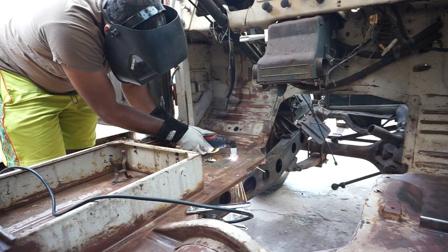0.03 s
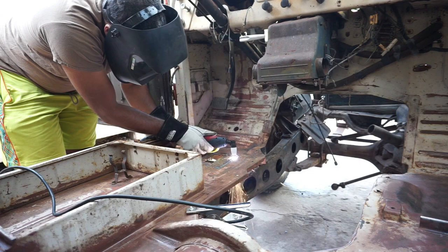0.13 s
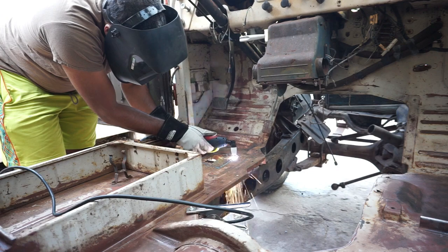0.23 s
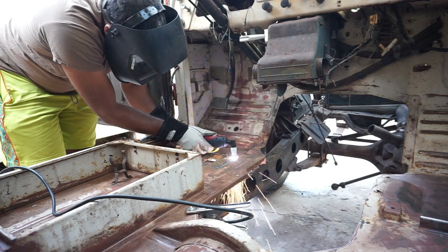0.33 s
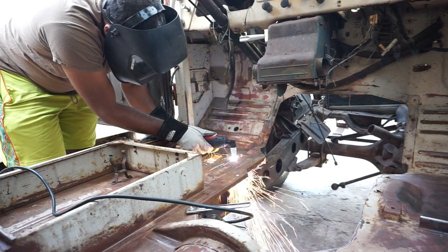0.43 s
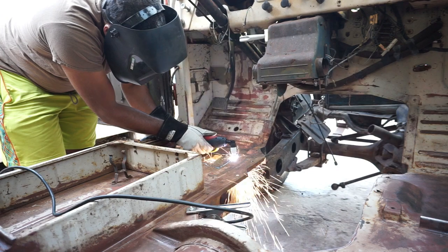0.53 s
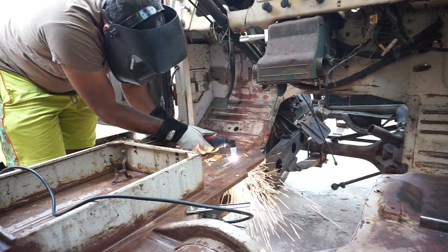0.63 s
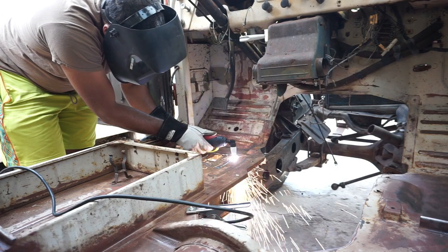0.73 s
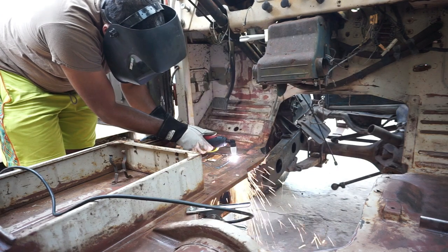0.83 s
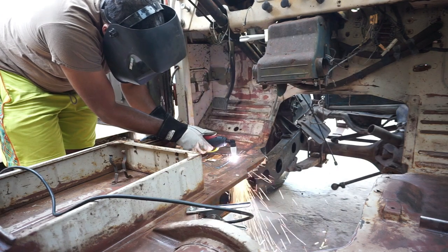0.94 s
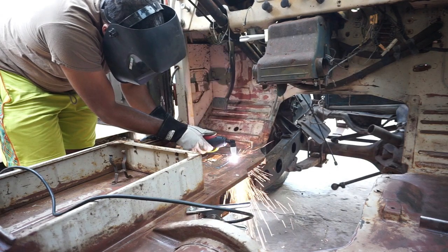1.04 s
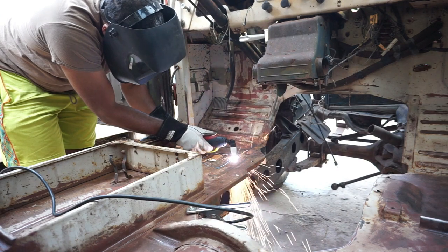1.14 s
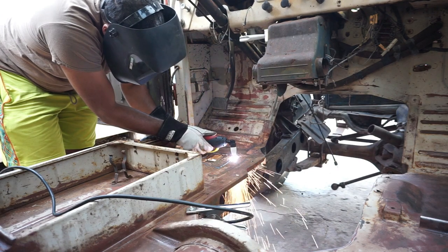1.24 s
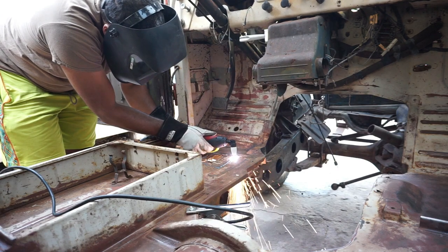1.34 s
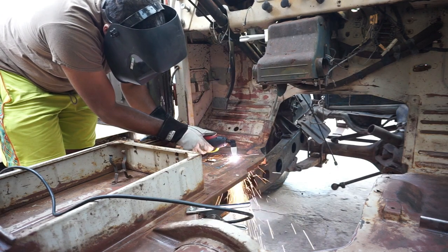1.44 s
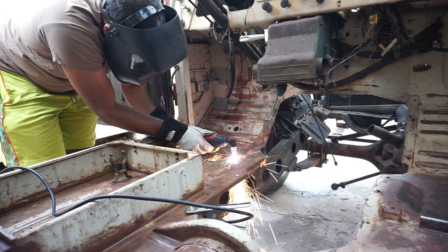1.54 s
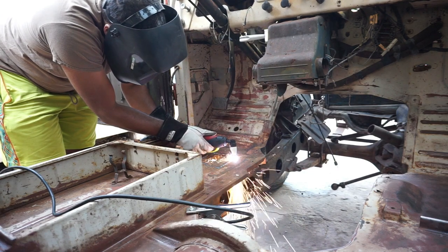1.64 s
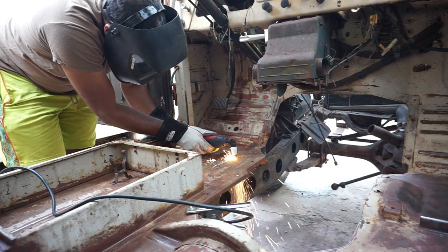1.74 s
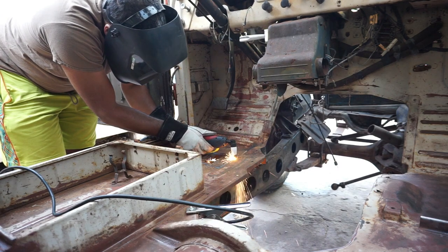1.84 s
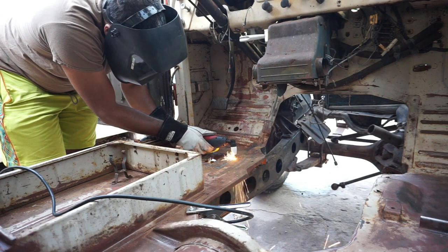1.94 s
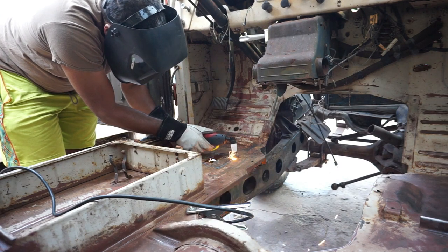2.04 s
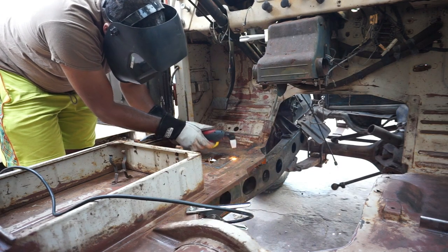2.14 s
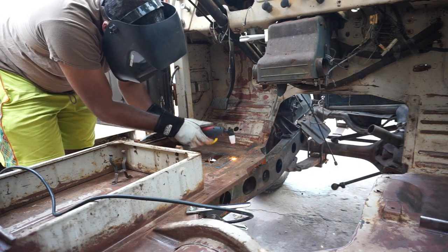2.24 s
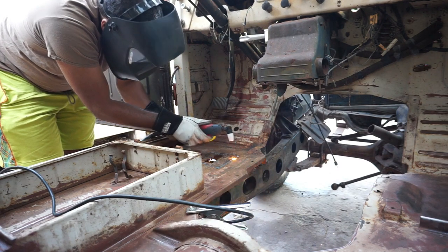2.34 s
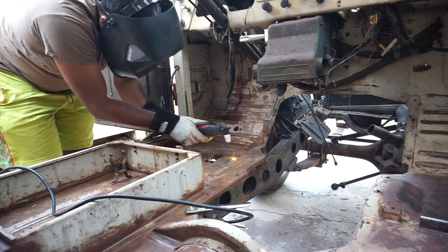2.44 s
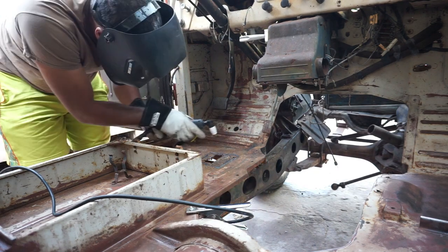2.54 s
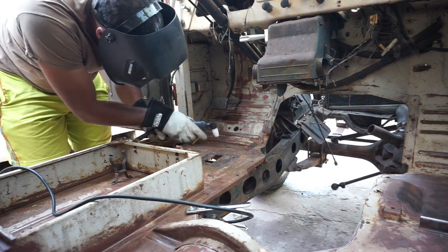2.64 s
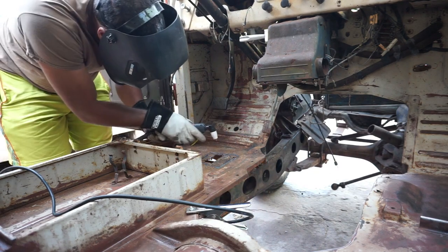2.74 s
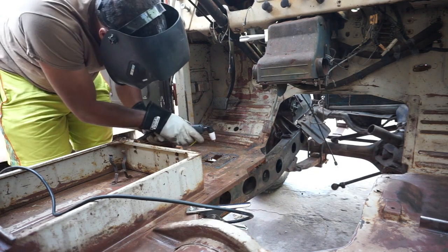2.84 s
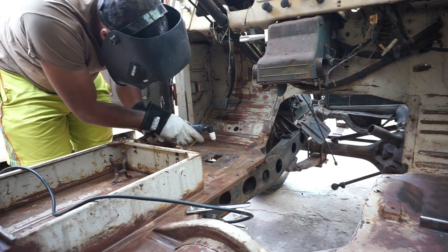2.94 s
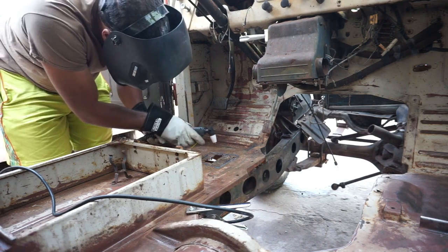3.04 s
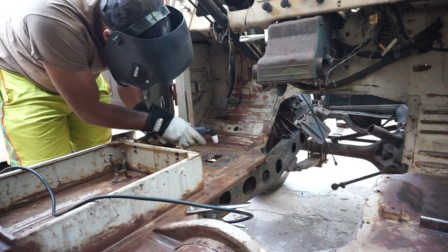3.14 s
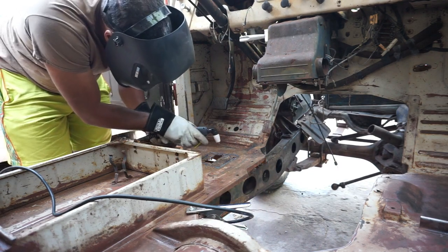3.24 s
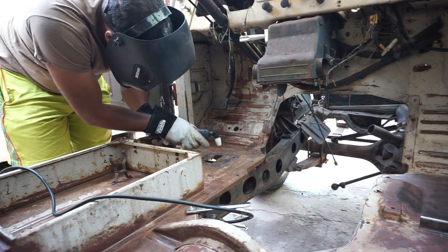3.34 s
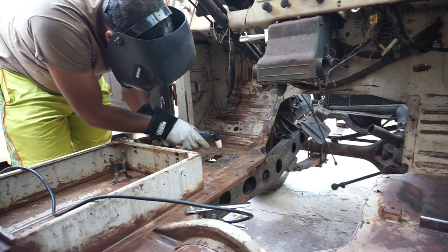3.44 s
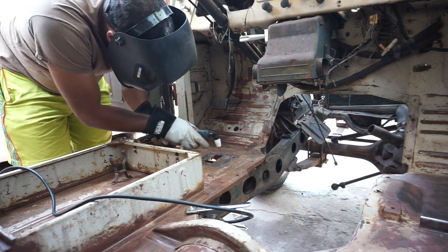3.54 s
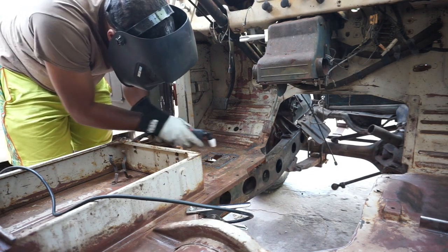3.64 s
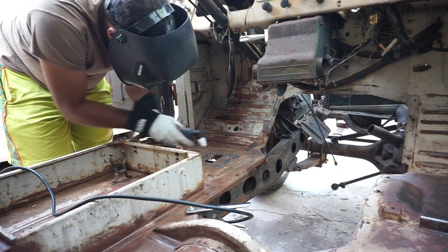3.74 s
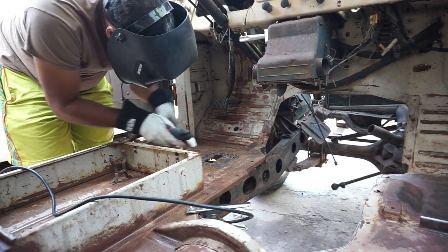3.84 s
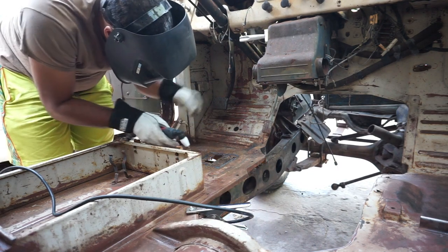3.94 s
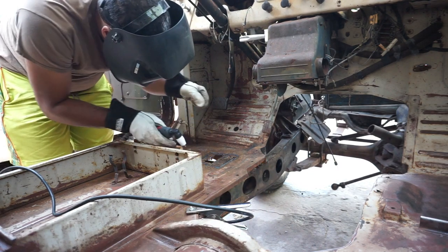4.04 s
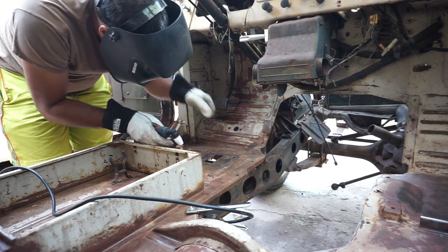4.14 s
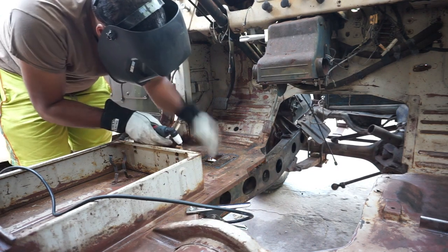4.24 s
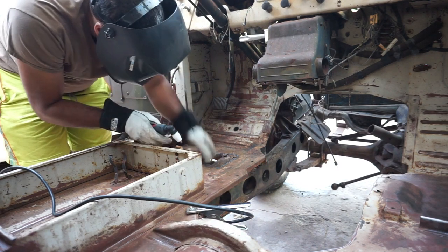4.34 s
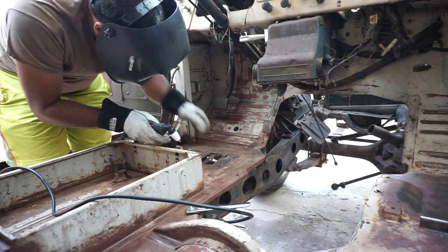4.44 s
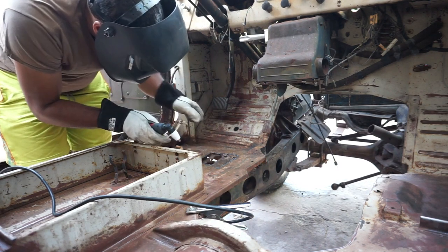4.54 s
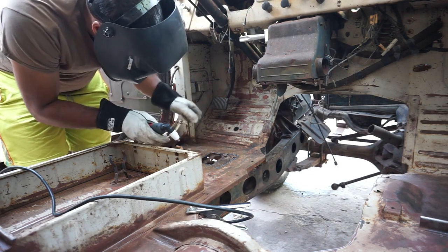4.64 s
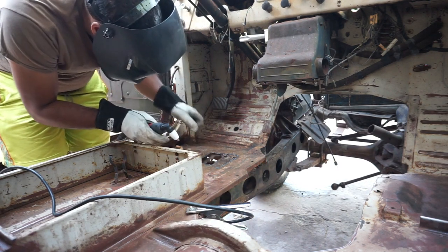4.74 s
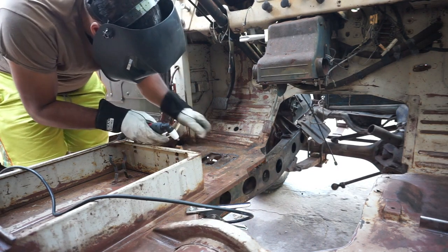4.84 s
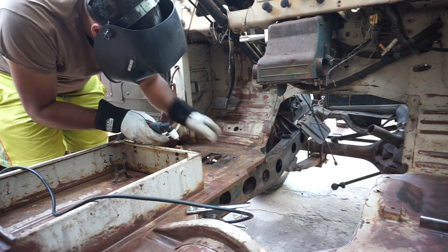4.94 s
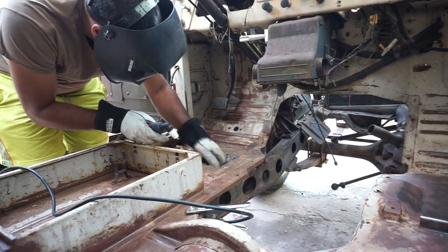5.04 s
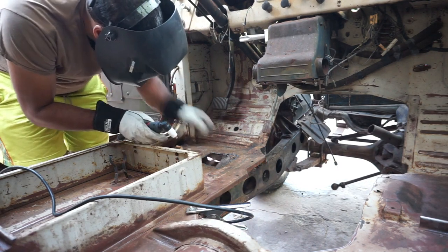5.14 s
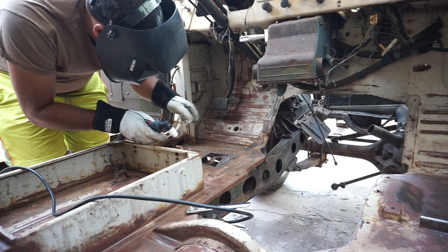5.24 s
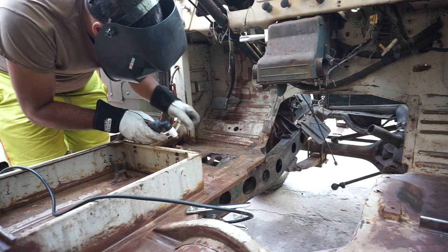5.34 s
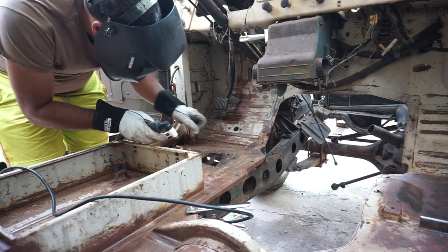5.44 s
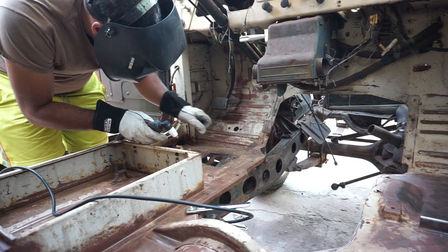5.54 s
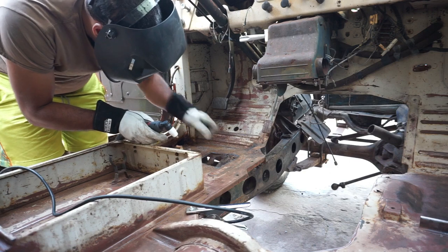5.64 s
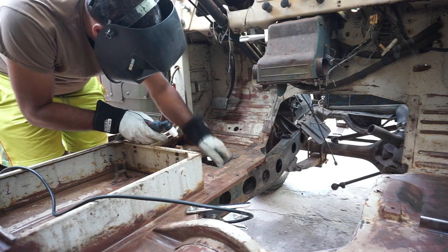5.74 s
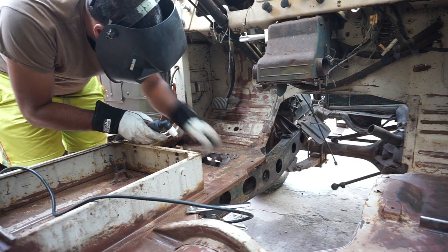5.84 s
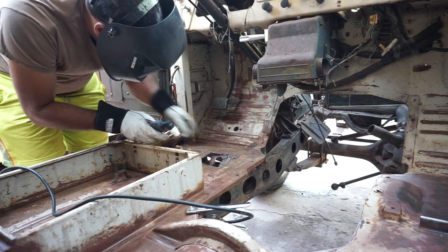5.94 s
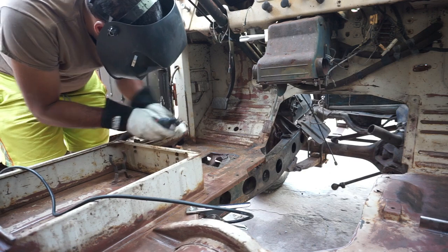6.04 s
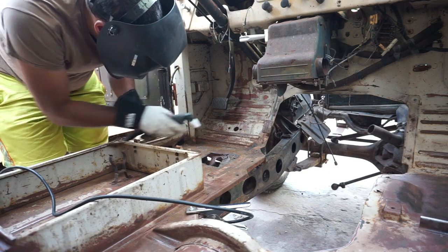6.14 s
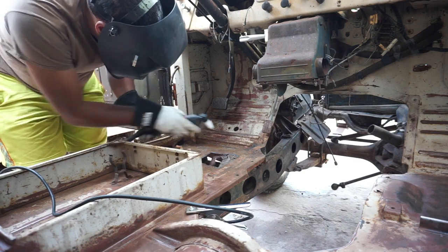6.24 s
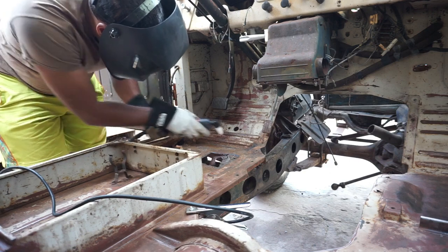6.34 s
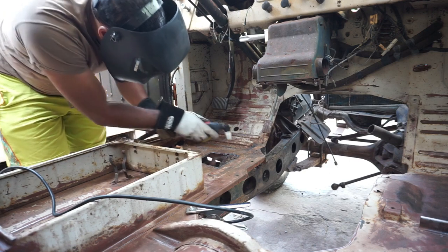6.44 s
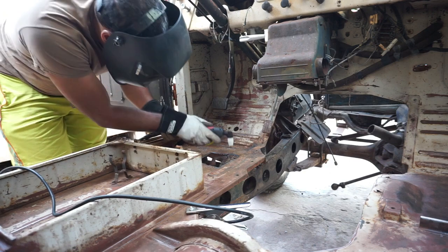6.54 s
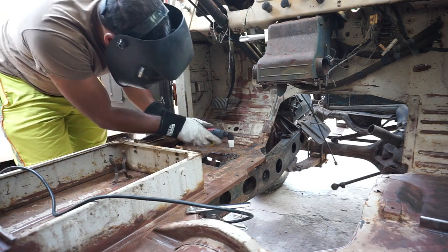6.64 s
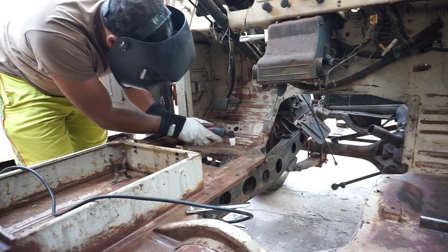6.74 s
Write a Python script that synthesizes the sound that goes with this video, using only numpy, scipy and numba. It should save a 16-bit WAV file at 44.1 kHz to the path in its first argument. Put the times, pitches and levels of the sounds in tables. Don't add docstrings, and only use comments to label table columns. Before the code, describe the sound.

A plasma torch hisses fiercely through rusty sheet steel, pops off and sighs shut; then a compressor throbs while metal clatters in three crashes.

```python
import sys
import numpy as np
from scipy import signal
from scipy.fft import rfft, irfft
from scipy.io import wavfile
from numba import njit

SR = 44100
rng = np.random.default_rng(int(sys.argv[2]) if len(sys.argv) > 2 else 0)


def linear_from_db(decibels):
    return 10 ** (np.asarray(decibels, float) / 20)


def transcribe(signal):
    frames = np.atleast_2d(signal).T
    limited = np.clip(frames, -1, 1)
    pcm = np.round(limited * 32767).astype(np.int16)
    wavfile.write(sys.argv[1], SR, pcm)


N = 299880
T = np.arange(N) / SR

JET_EDGES_HZ = [800, 2200, 6000]
# [f/Hz, density/dB per Hz]
JET_COLOUR = [(59, -91), (100, -67), (145, -64), (167, -46.5), (273, -52), (370, -41.5), (482, -32),
              (623, -35.5), (789, -25), (905, -22.5), (1080, -12.5), (1450, -15), (3590, -8), (5010, -8),
              (10400, 0), (11000, 3), (14300, -44), (22000, -120)]
# [f/Hz, side minus mid/dB]
JET_SIDE = [(60, -7), (110, -5), (190, -11), (350, -17), (630, -5), (1130, -5), (2020, -3.5), (3640, -2.5),
            (6540, -2), (11800, -4.5)]
# [t/s, level/dB]
ARC_HISS = [
    (0, -26.5),
    (.14, -26),
    (.22, -28.5),
    (.42, -27),
    (.7, -27),
    (1.0, -27.5),
    (1.33, -27),
    (1.65, -27),
    (1.72, -23),
]
# [t/s, f/Hz, level/dB]
DRIPS = [
    (0.149, 488, -50.5),
    (.5, 464, -55.5),
    (.58, 504, -52),
]
# [multiple of the turn, level/dB]
SHAFT = [(2, -62), (4, -64), (6, -46), (7, -53), (11, -54), (16, -48), (19, -57), (22, -51), (25, -54),
         (27, -54), (32, -53), (33, -46), (34, -42.5), (35, -48), (36, -52), (37, -52), (40, -55),
         (42, -55), (44, -53), (48, -50), (50, -54), (53, -50), (56, -55), (58, -54), (60, -54), (72, -58),
         (74, -58), (78, -57), (88, -55), (93, -57)]
# [f/Hz, level/dB]
FAN = [(368, -47.5), (487, -51), (685, -50), (1370, -55.5)]
# [f/Hz, density/dB per Hz]
PUMP_BODY = [(30, -60), (95, -60), (140, -22), (190, -24), (250, -11.5), (367, -4), (475, -2.5),
             (600, -11.5), (700, -6), (983, -6.5), (1570, -8), (2600, -12.5), (5000, -26.5), (8000, -22)]
# [f/Hz, density/dB per Hz]
PUMP_AIR = [(80, -11), (200, -0.5), (1760, -4), (3000, -29), (3420, 4), (3790, -2.5), (4130, 2.5),
            (5190, -3.5), (6180, 0.5), (8610, -14), (11000, -8), (14300, -42), (22000, -120)]
# [f/Hz, side minus mid/dB]
PUMP_SIDE = [(60, -15), (110, -9), (190, -17), (350, -14), (630, -9.5), (1130, -2), (2020, -4),
             (3640, -0.5), (6540, 1), (11800, 1.5)]
# [t/s, peak level/dB, crack level/dB, fade/s, chink f/Hz]
FIRST_HITS = [
    (4.346, -26, 6.5, .14, 10600),
    (4.356, -32, -1, .11, 8950),
    (4.364, -22, 6.5, 0.24, 8560),
    (4.39, -23.5, 2.5, 0.23, 3240),
    (4.442, -24, 3.5, 0.55, 10200),
    (4.549, -26, -4, 0.095, 9800),
    (4.556, -31.5, 1, 0.084, 2200),
    (4.628, -28.5, -5, 0.18, 2500),
    (4.68, -44, 6, 0.26, 9700),
    (4.72, -46, 4, 0.17, 6160),
]
SECOND_HITS = [
    (5.088, -23.5, 1.5, 0.17, 10060),
    (5.099, -18.5, 1, 0.19, 2070),
    (5.177, -23, 6.5, 0.17, 9930),
    (5.192, -21.5, -8, 0.1, 9050),
    (5.24, -27, -12, 0.53, 1500),
]
THIRD_HITS = [
    (5.797, -32.5, -2, .2, 2640),
    (5.823, -20, 2.5, 0.059, 2520),
    (5.852, -24.5, -14, 0.13, 5100),
    (5.89, -33, -30, 0.54, 2400),
]
# [f/Hz, width/Hz, level/dB]
FIRST_RINGS = [(315, 27, -2.5), (615, 21, 6.5), (1500, 160, -11.5), (2020, 94, -7), (2410, 55, -9),
               (3310, 47, -12), (4900, 110, -22), (6460, 53, -24), (7730, 51, -26), (8000, 33, -22),
               (9300, 55, -20), (9920, 48, -13)]
SECOND_RINGS = [(626, 25, 5.5), (810, 30, 3), (1570, 140, -5), (1970, 110, -3.5), (2580, 49, -19),
                (2940, 61, -8), (3340, 59, -12), (3650, 96, -16), (5180, 53, -14), (5500, 36, -24),
                (9700, 52, -23), (10200, 47, -27)]
THIRD_RINGS = [(280, 40, -33), (875, 77, 3.5), (1144, 43, 4.5), (1680, 61, -6), (2056, 29, -18),
               (2380, 93, -7), (3260, 35, -22), (4930, 71, -21), (5100, 110, -17), (7160, 46, -28),
               (8600, 48, -30), (10100, 120, -36)]
# [f/Hz, t60/s]
BOOM = [(166, 0.88), (215, 1), (283, 0.35)]
# [f/Hz, density/dB per Hz]
CLATTER = [(90, -52), (160, -9), (300, -46), (600, -9), (1100, 1.5), (2200, -3.5), (4000, -9), (7000, -21),
           (11000, -83)]
# [f/Hz, density/dB per Hz]
CRACK = [(800, -24), (1600, 2), (2500, 5.5), (5000, -1.5), (8000, -0.5), (10500, -2)]
# [f/Hz, side minus mid/dB]
HIT_SIDE = [(60, -24), (110, -35), (190, -19.5), (350, -13), (630, -12.5), (1130, -5), (2020, -5.5),
            (3640, -2.5), (6540, 0.5), (11800, -2.5)]
# [t/s, drop/dB]
DUCKS = [
    (4.36, 4.5),
    (5.1, 6),
    (5.83, 3),
]

GARAGE_T60_S = 0.25
ARC_OFF_S, ARC_DIES_S, POP_S = 1.701, 0.051, 1.715
SPLASH_DB, THROUGH_DB, PIERCE_S = [4, 4.5, 11], [-2, -3, -0.5], 0.79
AIR_DB, AIR_LIFT_DB, SHUT_DB, SHUT_LIFT_DB = -40.5, [3.5, 4, 12.5], -43, [1.5, 15, 21]
SIGH_S, SIGH_RISE_S, SIGH_DB, SIGH_FADE_DB_S, SIGH_END_S = 2.064, 0.074, -36, 54, 2.45
SIGH_TOP_HZ, SIGH_LOW_HZ, SIGH_OCT_S, SPURT_DB, SPURT_S, SHUTS_S = 7460, 1140, 8.9, 6, 0.074, 0.074
TORCH_PAN_DB = -1.7
TURN_HZ = 29.07
PUMP_ON_S, PUMP_DB, LEAK_DB, LEAK_DUCK = 2.575, -31.5, -41.5, 1.1
DUCK_FALL_S, DUCK_BACK_S = 0.14, 1.63
RATTLE_SHARE, RATTLE_S, RATTLE_HARD_S, LAST_RATTLE_S = 0.91, 0.0064, 0.046, 0.014
CHINK_WIDTH_HZ = 262
TOP_HZ = 11020


def level(x, db):
    return x * linear_from_db(db) / np.sqrt(np.mean(x ** 2))


def colour(x, points):
    hz, db = np.transpose(points)
    f = np.maximum(np.arange(len(x) // 2 + 1) * SR / len(x), 1)
    return irfft(rfft(x) * linear_from_db(np.interp(np.log(f), np.log(hz), db)), len(x))


def noise(points):
    return level(colour(rng.standard_normal(N), points), 0)


def walk(rate):
    knots = rng.standard_normal(int(N / SR * 150))[:int(N / SR * rate) + 2]
    return 1.08 * np.interp(T * rate, np.arange(len(knots)), knots)


def ramp(start, length):
    return np.clip((T - start) / length, 0, 1)


@njit
def glide(x, hz, share):
    y, band, low = np.empty(len(x)), 0., 0.
    for i in range(len(x)):
        g = np.tan(np.pi * hz[i] / SR)
        v = (band + g * (x[i] - low)) / (1 + g * (g + share))
        band, low, y[i] = 2 * v - band, low + 2 * g * v, share * v
    return y


def garage(x, side, wet, pan_db, sway):
    t = np.arange(SR // 3) / SR
    clouds = rng.standard_normal((3, len(t))) * np.exp(-np.log(1000) * t / GARAGE_T60_S)
    clouds /= np.sqrt(np.sum(clouds ** 2, axis=1, keepdims=True))
    wet = np.clip(wet, 0, 1)
    echoes = signal.oaconvolve(x[None], clouds, axes=1)[:, :N]
    mid = np.sqrt(1 - wet) * x + np.sqrt(wet) * echoes[0]
    angle = sway * walk(6)
    apart = np.cos(angle) * echoes[1] + np.sin(angle) * echoes[2]
    lag = 1.2 * colour(np.gradient(mid), [(700, 0), (2500, -24)])
    diff = colour(apart, side) + lag
    return np.array([mid + diff, mid - diff]) * linear_from_db(np.array([1, -1])[:, None] * pan_db / 2)


def jet_levels():
    def regions(hiss, lift):
        return hiss + np.append(0, lift)[:, None]

    fresh = np.exp(-T / PIERCE_S)
    arc = np.interp(T, *np.transpose(ARC_HISS))
    arc = arc + fresh * regions(0, SPLASH_DB) + (1 - fresh) * regions(0, THROUGH_DB)
    shut = ramp(SIGH_S, SHUTS_S)
    air = (1 - shut) * regions(AIR_DB, AIR_LIFT_DB) + shut * regions(SHUT_DB, SHUT_LIFT_DB)
    air[0] += SPURT_DB * np.exp(-((T - SIGH_S - .02) / SPURT_S) ** 2)
    off = ramp(ARC_OFF_S, ARC_DIES_S)
    return (1 - off) * arc + off * air


def gas_jet():
    spit_size = linear_from_db(4.6 * np.minimum(rng.exponential(size=N), 3.5))
    spits = (rng.random(N) < 120 / SR) * spit_size * rng.choice([-1, 1], N)
    gas = rfft(colour(rng.standard_normal(N) + 2.2 * spits, JET_COLOUR))
    f = np.arange(len(gas)) * SR / N + 1
    above = [np.ones(len(f))] + [1 / (1 + (edge / f) ** 6) for edge in JET_EDGES_HZ] + [0 * f]
    bands = [irfft(gas * (above[k] - above[k + 1]), N) for k in range(4)][::-1]
    flutter = .6 * walk(16)
    jet = sum(band * linear_from_db(db + flutter + walk(24.84)) for band, db in zip(bands, jet_levels()))
    return jet / np.std(bands[0])


def far_motor():
    return linear_from_db(-88.5) * np.cos(2 * np.pi * 6 * TURN_HZ * T + 3.6 * walk(8))


def slag_drips():
    return sum(linear_from_db(db) * np.exp(-((T - s) / 0.014) ** 2) * np.sin(2 * np.pi * hz * (T - s))
               for s, hz, db in DRIPS)


def arc_pop():
    fade = (T > POP_S) * np.exp(-np.clip(T - POP_S, 0, 5) / 0.046)
    burst = linear_from_db(-39.5) * fade * rng.standard_normal(N)
    return colour(burst, [(100, -25), (250, -10), (1100, 16), (2200, -4), (6000, -40)])


def valve_sigh():
    late = T - SIGH_S
    centre = SIGH_TOP_HZ * 2 ** (-SIGH_OCT_S * np.clip(late, -.05, 1))
    centre = np.clip(centre, SIGH_LOW_HZ, .4 * SR)
    swell = ramp(SIGH_S - SIGH_RISE_S, SIGH_RISE_S) ** 2
    swell = swell * linear_from_db(SIGH_DB - SIGH_FADE_DB_S * np.maximum(late, 0)) * (1 - ramp(SIGH_END_S, 0.086))
    sigh = glide(glide(rng.standard_normal(N), centre, 1.4), centre, 1.4)
    return swell * sigh / np.sqrt(centre / SR)


def torch():
    dry_torch = gas_jet() + far_motor() + slag_drips() + arc_pop() + valve_sigh()
    return garage(dry_torch, JET_SIDE, 0.24, TORCH_PAN_DB, sway=2.8) * (T < PUMP_ON_S)


def compressor():
    turns = TURN_HZ * (T + .016) + 0.0046 * walk(3)
    order, line_db = np.transpose(SHAFT)
    step = np.arange(1024) / 1024
    phase = .06 * (order - 34) ** 2 + .15 * rng.standard_normal(len(order))
    stroke = sum(np.sqrt(2) * linear_from_db(db + 31.5) * np.cos(2 * np.pi * k * step + p)
                 for k, db, p in zip(order, line_db, phase))
    orders = np.interp(turns % 1, step, stroke, period=1) * linear_from_db(3.1 * walk(9.2))
    for hz, db in FAN:
        tone = np.cos(2 * np.pi * hz * T + 0.87 * walk(12))
        orders += np.sqrt(2) * linear_from_db(db + 32.5 + 0.5 * walk(7.6)) * tone
    rattle = np.interp(turns % 1, step, rng.standard_normal(len(step)), period=1)
    rattle = 0.49 * colour(rattle, [(1100, -11), (1900, -10.5)])
    puff = 1 + 0.033 * np.cos(2 * np.pi * turns + 0.76) + 0.038 * np.cos(4 * np.pi * turns + 2.0)
    casing = level(colour(puff * rng.standard_normal(N) + rattle, PUMP_BODY), -2.43)
    duck_db = duck()
    gain = linear_from_db(PUMP_DB + duck_db)
    leak = noise(PUMP_AIR) * linear_from_db(LEAK_DB + LEAK_DUCK * duck_db + 0.52 * walk(9.6))
    both = garage(casing * gain + leak, PUMP_SIDE, 0.18, -0.14, sway=2.6)
    both += garage(orders * gain, PUMP_SIDE, 0, -0.44, sway=.6)
    return both * (T >= PUMP_ON_S)


def throw(hits, rings, ring_db, boom_db):
    dull, sharp, chinks = np.zeros(N), np.zeros(N), np.zeros(N)
    grit = linear_from_db(1.5 * walk(140)) * rng.standard_normal((2, N))
    gaps = np.append(np.diff(np.transpose(hits)[0]), LAST_RATTLE_S)
    for (s, db, crack_db, fade, hz), gap in zip(hits, gaps):
        hold = min(RATTLE_SHARE * gap, RATTLE_S + RATTLE_HARD_S * linear_from_db(db + 20))
        age = np.clip(T - s, 0, 2)
        shape = linear_from_db(db) * (age > 0) * np.exp(-np.log(1000) * np.maximum(age - hold, 0) / fade)
        dull += shape * np.minimum(age / 0.012, 1)
        snap = np.exp(-age / 0.034) + 0.22 * np.exp(-age / 0.0013)
        edge = shape * linear_from_db(crack_db) * np.minimum(age / 0.0045, 1) * snap
        sharp += edge
        chinks += glide(edge * grit[1], np.full(N, 1. * hz), CHINK_WIDTH_HZ / hz)
    push = rfft(dull * grit[0])
    f = np.arange(len(push)) * SR / N
    steel = sum(linear_from_db(ring_db + db) / (1 + 2j * (f - hz) / max(width, 48)) for hz, width, db in rings)
    steel += sum(linear_from_db(db) / (1 + 1j * np.pi * t60 * (f - hz) / np.log(1000)) ** 2
                 for (hz, t60), db in zip(BOOM, boom_db))
    steel = steel / (1 + (130 / (f + 1)) ** 6)
    clatter = linear_from_db(4.5) * colour(dull * grit[0], CLATTER)
    crack = linear_from_db(-0.5) * colour(sharp * grit[1], CRACK)
    return irfft(push * steel, N) + clatter + crack + linear_from_db(12) * chinks


def duck():
    total = np.zeros(N)
    for s, db in DUCKS:
        age = np.maximum(T - s, 0)
        total -= db * (1 - np.exp(-age / DUCK_FALL_S)) * np.exp(-age / DUCK_BACK_S)
    return total


def scene():
    first = throw(FIRST_HITS, FIRST_RINGS + [(776, 130, -1.1)], 13, [10, 18, 22])
    second = throw(SECOND_HITS, SECOND_RINGS + [(815, 22, -11)], 11.3, [31, 22, 14])
    third = throw(THIRD_HITS, THIRD_RINGS + [(592, 19, 3.5)], 13.0, [32, 18, 20])
    tray = garage(first + second + third, HIT_SIDE, 0.31, -0.65, sway=2.7)
    return torch() + compressor() + tray


def top_cut(x):
    return signal.sosfilt(signal.butter(12, 12350, fs=SR, output="sos"), x)


def record(dry):
    soft = np.tanh(1.089 * dry) / 1.118
    dulled = signal.sosfilt(signal.ellip(12, .2, 62, TOP_HZ, fs=SR, output="sos"), soft)
    return top_cut(dulled)


dry = scene()
out = record(dry)
transcribe(out)
```